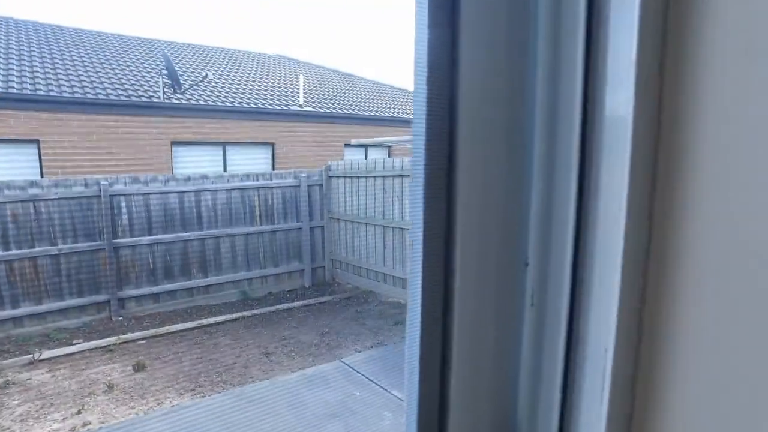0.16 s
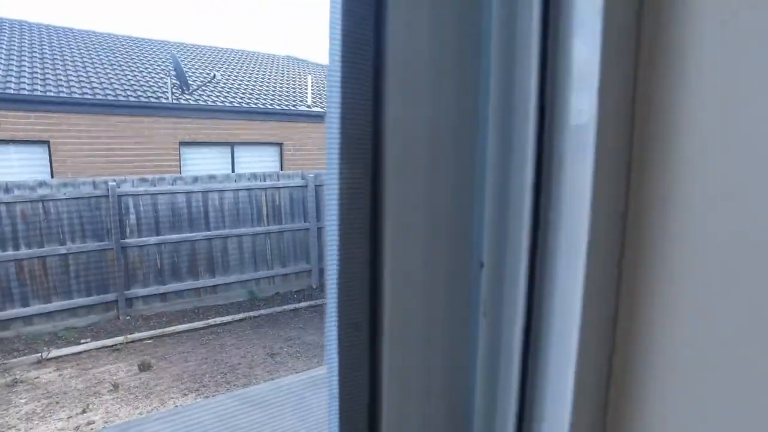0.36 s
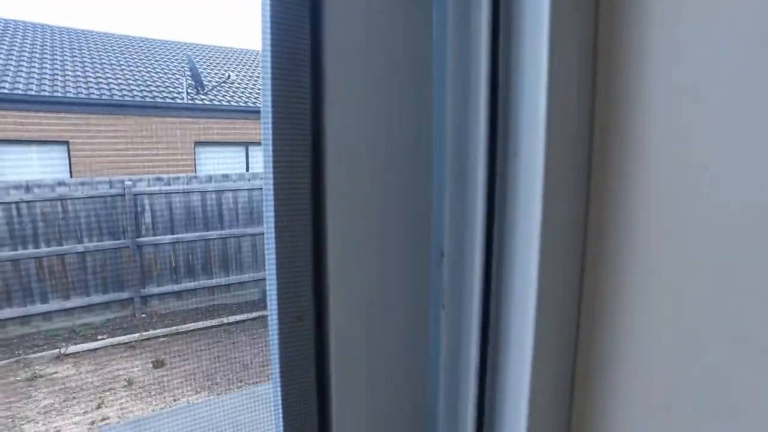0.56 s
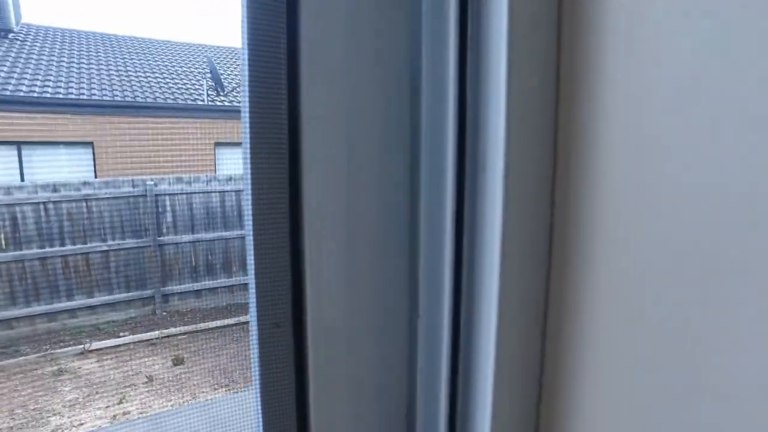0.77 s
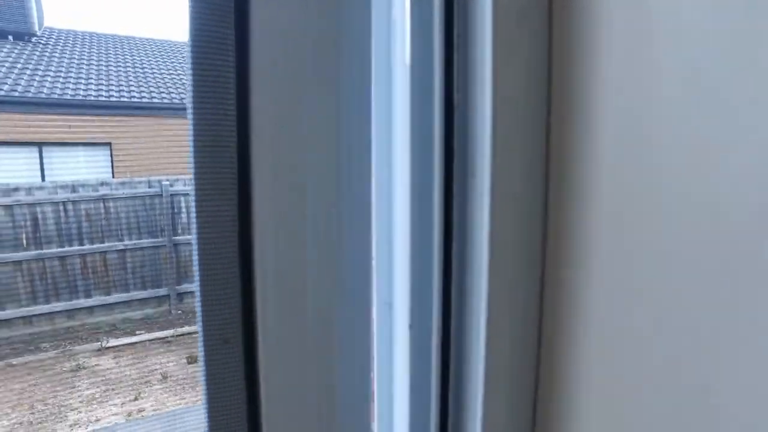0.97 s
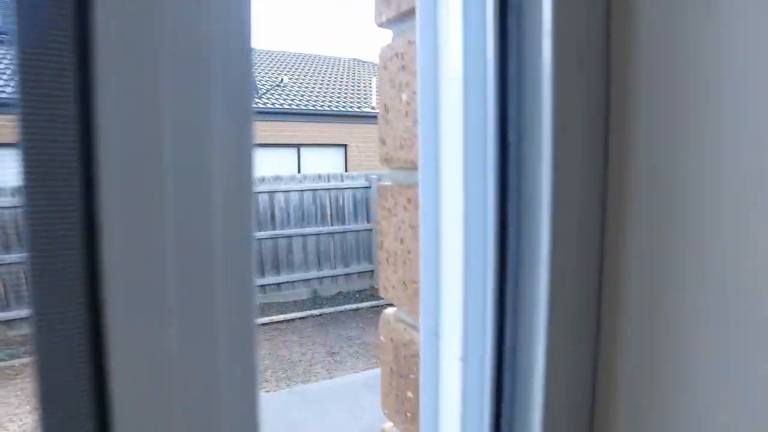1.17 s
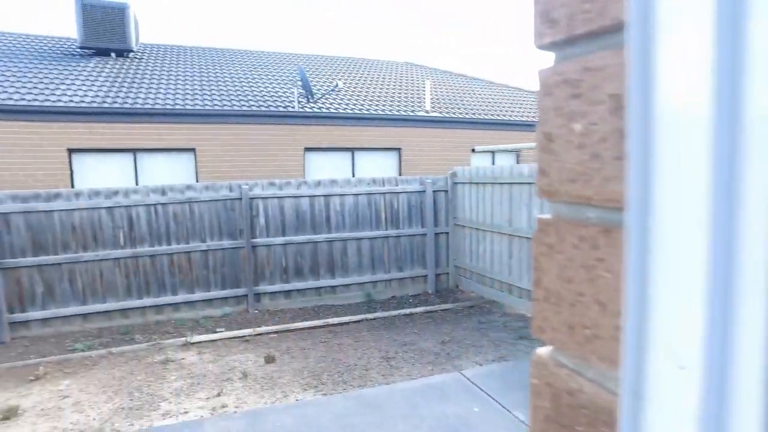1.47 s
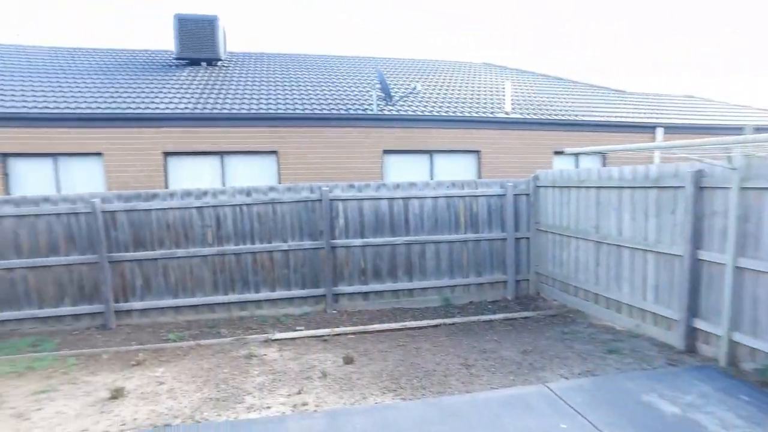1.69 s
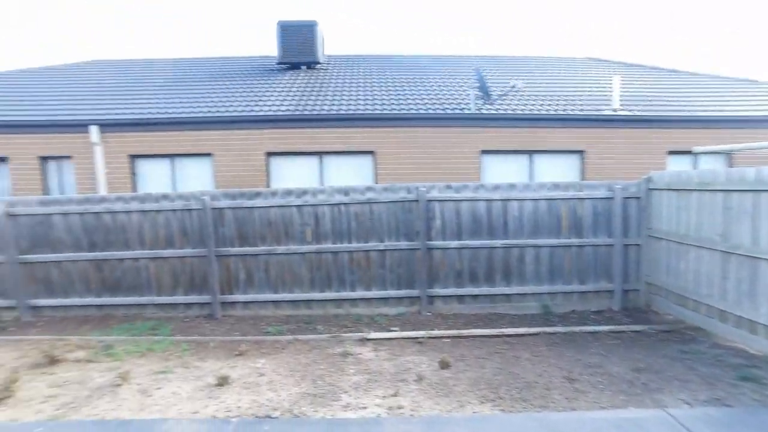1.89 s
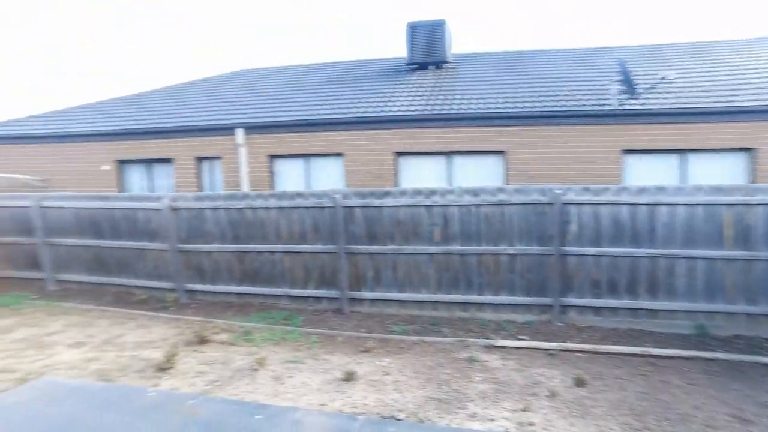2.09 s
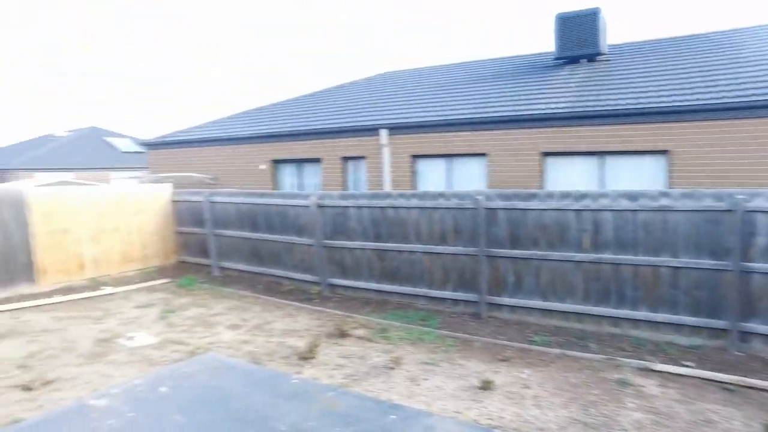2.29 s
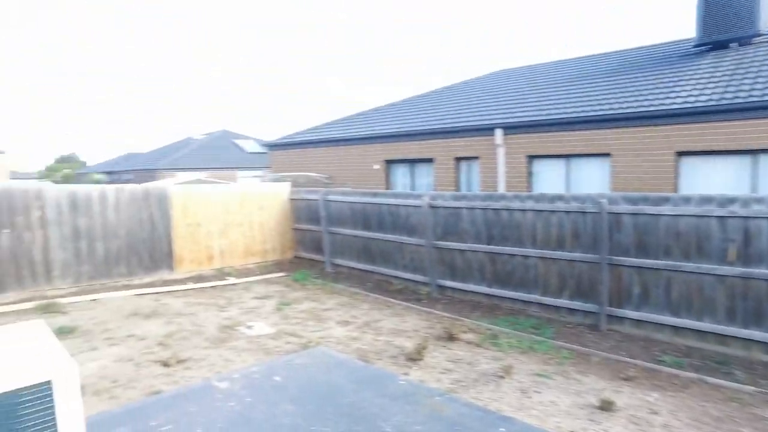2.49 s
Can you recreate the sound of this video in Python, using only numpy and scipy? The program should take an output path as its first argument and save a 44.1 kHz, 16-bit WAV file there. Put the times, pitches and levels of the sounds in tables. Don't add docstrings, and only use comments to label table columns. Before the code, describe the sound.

A heavy sliding door rumbles to a stop, a latch snaps, then wind buffets the microphone

```python
import sys
import numpy as np
from scipy import signal
from scipy.fft import rfft, irfft
from scipy.io import wavfile
from scipy.ndimage import uniform_filter1d

SR = 44100
rng = np.random.default_rng(int(sys.argv[2]) if len(sys.argv) > 2 else 0)


def rack_gain(trim_db):
    fader = np.asarray(trim_db, float)
    return 10 ** (fader / 20)


def persist_wave(psi):
    counts = np.round(np.clip(psi, -1, 1) * 32767).astype(np.int16)
    wavfile.write(sys.argv[1], SR, np.atleast_2d(counts).T)


N = 116865

# time [s], level [dB]
GLASS_ROLL = [(0, -34.5), (.1, -37.5), (.2, -38), (.3, -42), (.36, -46.5), (.4, -48), (.46, -54.5),
              (.52, -58), (.75, -67)]
# frequency [Hz], width [Hz], level [dB]
GLASS_BODY = [(143, 22, -11), (248, 20, 7), (379, 68, 5.5), (510, 51, -7.5), (1170, 120, -1.5),
              (1354, 64, -1)]
# frequency [Hz], level [dB]
GLASS_RUB = [(100, 2.5), (236, 4.5), (546, -6), (900, -13), (1900, -16), (3900, -25), (12000, -38),
             (14600, -74)]
# time [s], level [dB]
WHEEL_ROLL = [(0.0, -49), (0.024, -44), (0.1, -48), (0.114, -40), (0.132, -49), (0.156, -42), (0.186, -50),
              (0.196, -37), (0.62, -73)]
# frequency [Hz], width [Hz], level [dB]
WHEEL_BODY = [(2400, 400, -7), (2660, 330, 0), (3250, 450, -6)]
# start [s], level [dB], brightness [dB per octave]
KNOCKS = [(.001, -26.5, -2.4), (.173, -25, 1.5), (.813, -40.5, -3), (.9115, -19.5, 1), (.917, -35, 2.5),
          (.923, -27, -0.6), (.942, -33.5, -2), (.972, -32.5, 0), (1.35, -43, -2.5), (1.383, -37, -1.5),
          (1.92, -40, 10)]
# frequency [Hz], level [dB], 60 dB decay [s]
FRAME_MODES = [(99.3, -5, .12), (184.3, -8, .15), (293.3, 5, .17), (395, 0, .11), (472, -4.5, .09),
               (726, -4, .05), (1087, -6, .06), (1450, -5, .04), (1850, -9, .03), (2500, -18, .02)]
# time [s], level [dB]
BREEZE = [(0, -41), (.4, -35.5), (.72, -42.5), (.9, -34), (1.3, -42), (1.55, -35.5), (1.8, -39.5),
          (2.0, -35.5), (2.1, -28.5), (2.4, -28.5), (2.65, -31)]
# frequency [Hz], density [dB per Hz]
RUMBLE = [(4, 4), (15, 7.5), (35, 9), (70, -3), (140, -15.5), (300, -55.5)]
# time of the swing [s], push [dB], suction [dB], length [s]
EDDIES = [(0.867, -22.5, -38, 0.0042), (1.161, -31, -27.5, 0.0047), (1.565, -24.5, -24, 0.0072),
          (1.932, -48, -24, 0.0081), (2.042, -24, -8, 0.01), (2.133, -12, -14.5, 0.024),
          (2.266, -9.5, -14, 0.014), (2.345, -13.5, -4.5, 0.016), (2.44, -8.5, -31, 0.032),
          (2.454, -27, -14, 0.0098), (2.505, -31, -15.5, 0.012), (2.586, -31, -15, 0.035),
          (2.67, -12, -18, 0.022)]
# frequency [Hz], level [dB]
YARD_COLOUR = [(90, 0.5), (250, -4), (700, -13.5), (1500, -20.5), (3200, -26.5), (6000, -74)]
# time [s], yard [dB], hiss [dB]
AIR_LEVELS = [(0, 3.5, -62), (.8, -1.5, -60.5), (1.4, 5, -72), (2.3, 2, -60.5), (2.65, 0, -71.5)]
# frequency [Hz], density [dB per Hz]
HISS_COLOUR = [(1000, 4.5), (7500, 6.5), (12500, -1.5), (15000, 5)]
# start [s], level [dB], brightness [dB per octave]
TICKS = [(.079, -42, -1), (.1121, -27, -8), (.1511, -25, -13), (.1965, -20.5, -6), (.201, -26, -11),
         (.2184, -24.5, -3), (.2235, -29, 7), (.231, -33, -4), (.28, -27.5, -1.5), (.33, -32, -3),
         (.5132, -46, -10), (.7851, -40, -3)]
# frequency [Hz], level [dB], 60 dB decay [s]
TRACK_MODES = [(2600, 6, .022), (3450, 2, .018), (4400, -6, .014), (5050, -7, .014), (5750, -9, .012),
               (6900, -12, .01), (8100, -14, .011)]
# time [s], roll [dB], brush strip [dB]
SCREEN_ROLL = [(.8, -63, -90), (.97, -43.5, -65), (1.12, -51.5, -60), (1.3, -42, -53.5), (1.5, -40.5, -54),
               (1.66, -39.5, -62), (1.8, -42.5, -73), (2.0, -43, -59.5), (2.15, -52, -67.5)]
# frequency [Hz], width [Hz], level [dB]
SCREEN_BODY = [(217, 52, 5.5), (283, 28, 8.5), (400, 130, -40), (756, 580, -1.5), (1230, 1100, -30)]
# frequency [Hz], density [dB per Hz]
BRUSH_COLOUR = [(1760, -20), (3000, -7), (4500, -2), (5250, -4), (5900, 1), (7200, -1), (9500, -7.5),
                (15000, -15)]
# time [s], pitch [Hz], level [dB]
SQUEAL = [(.93, 6100, -80), (.98, 6080, -65), (1.05, 6120, -65), (1.08, 6170, -58), (1.105, 6130, -67),
          (1.15, 6050, -63), (1.21, 5930, -66), (1.25, 5870, -61), (1.33, 5900, -70)]
# start [s], level [dB], brightness [dB per octave]
SNAPS = [
    (.8612, -31.5, -9.5),
    (.8640, -29, -7),
    (.8685, -37, 4),
    (.8725, -28.5, 3),
    (.877, -37, -11),
    (.883, -38, -1),
]
# frequency [Hz], level [dB], 60 dB decay [s]
LATCH_MODES = [(700, -3, .022), (877, 2, .035), (1090, 1, .04), (1300, -6, .03), (1590, -4, .03),
               (1950, -12, .02), (2380, -8, .025), (2800, 6, .035), (3400, -13, .012), (4540, -11, .02),
               (5040, -12, .02), (5880, -8, .025)]
# start [s], level [dB], brightness [dB per octave]
PINGS = [
    (.8605, -30, -0.5),
    (.8655, -38.5, 4.5),
    (.8682, -26, 0),
    (.872, -41, 3),
    (.877, -46, -4),
]
# frequency [Hz], level [dB], 60 dB decay [s]
PIN_MODES = [(5830, -8, .012), (7900, -5, .012), (8350, -2, 0.011), (9000, -3, .01), (10300, -8, 0.011),
             (11900, -11, 0.011), (13300, -12, .012)]
# start [s], level [dB], brightness [dB per octave]
CLICKS = [(.912, -48, -5), (.953, -50, 3), (1.005, -50, 1), (1.2325, -32, -2), (1.2615, -40, -1.5),
          (1.2685, -30, -.5), (1.307, -42, -1), (1.443, -46, 1), (1.5466, -40, 2), (1.577, -41, 3),
          (1.84, -43, -5), (1.89, -43, -6), (1.943, -47, 2), (2.17, -48, 0), (2.232, -41, -3),
          (2.265, -44, -6)]
# frequency [Hz], level [dB], 60 dB decay [s]
GUIDE_MODES = [(2800, -4, .012), (4400, 0, .012), (5200, -3, .01), (7050, -1.5, .015), (9500, -8, .008)]
# centre [s], length [s], level [dB]
SCUFFS = [
    (1.166, 0.058, -59),
    (1.577, 0.15, -49.5),
    (1.775, 0.28, -52),
    (1.955, 0.025, -50.5),
    (2.214, 0.042, -55.5),
]
# frequency [Hz], level [dB]
SCUFF_COLOUR = [(1500, -3.5), (5200, -0.5), (6000, 2), (8300, 4.5), (12000, -0.5), (15000, -2.5)]
# time [s], pitch [Hz], level [dB], octave level [dB]
BIRD = [(2.505, 2860, -85, -91), (2.52, 2910, -68, -72), (2.555, 2985, -60, -70), (2.585, 2900, -69, -70),
        (2.592, 3250, -76, -64), (2.602, 3080, -67, -62), (2.613, 3070, -72, -63), (2.619, 2900, -68, -68),
        (2.624, 2800, -90, -90)]
# time [s], pitch [Hz], level [dB]
BIRD_FALL = [(2.61, 2950, -85), (2.618, 2800, -63), (2.635, 2300, -64), (2.65, 2250, -62)]


def evened(x):
    return x / np.sqrt(np.mean(x ** 2) + 1e-20)


def curve(rows, axis=1, off=None):
    rows = np.array(rows, float)
    return np.interp(np.arange(N) / SR, rows[:, 0], rows[:, axis], off, off)


def colour(x, points):
    f, db = np.transpose(points)
    hz = np.fft.rfftfreq(N, 1 / SR) + .1
    low = 12 * np.minimum(np.log2(hz / f[0]), 0)
    gain = rack_gain(np.interp(np.log(hz), np.log(f), db) + low)
    return evened(irfft(rfft(x) * gain, N))


def wander(rate_hz):
    hz = np.fft.rfftfreq(N, 1 / SR)
    slow = (hz > 0) / (1 + (hz / rate_hz) ** 2)
    return evened(irfft(rfft(rng.standard_normal(N)) * slow, N))


def resonate(x, hz, width):
    turn = np.exp(2j * np.pi * np.cumsum(hz * np.ones(len(x))) / SR)
    r = np.exp(-np.pi * width / SR)
    return 2 * (turn * signal.lfilter([1 - r], [1, -r], x / turn)).real


def resonate_twice(x, hz, width):
    return resonate(resonate(x, hz, width), hz, width)


def grit(per_s, spread_db):
    size = rack_gain(spread_db * np.minimum(rng.exponential(1, N), 4))
    sign = rng.choice([-1., 1.], N)
    return evened(size * sign * (rng.random(N) < per_s / SR))


def body(x, peaks, filt=resonate):
    return evened(sum(rack_gain(db) * evened(filt(x, hz, width)) for hz, width, db in peaks))


def strike(hits, modes, crack_db, rise_s, rough):
    out, t = np.zeros(N + SR), np.arange(SR // 4) / SR
    chance = rng.random((len(hits), len(modes), 2))
    for (s, db, tilt_db), draw in zip(hits, chance):
        ring = rack_gain(crack_db - 60 * t / 0.017) * rng.standard_normal(len(t))
        for (hz, mode_db, t60), (a, b) in zip(modes, draw):
            level_db = mode_db + tilt_db * np.log2(hz / 2000) + 6.17 * (a - 2.0)
            drift = uniform_filter1d(np.cumsum(rng.standard_normal(len(t))), size=24)
            phase = 2 * np.pi * hz * (1 + 0.06 * (b - .5)) * t + rough * np.sqrt(hz / 2000) * drift
            ring += rack_gain(level_db - 60 * t / t60) * np.sin(phase)
        at = max(round(s * SR), 0)
        out[at:at + len(t)] += rack_gain(db) * ring * np.minimum(t / rise_s, 1)
    return out[:N]


def doorway(x):
    t60_s, level_db = 0.077, -7
    t = np.arange(SR // 2) / SR
    tail = grit(2000, .1)[:len(t)] * rack_gain(-60 * t / t60_s) * (t > .004)
    return x + rack_gain(level_db) * signal.fftconvolve(x, tail / np.linalg.norm(tail))[:N]


def glass_door():
    drive = grit(4000, 1.5) * rack_gain(.6 * wander(40))
    rub = colour(grit(9000, 1.2) * rack_gain(.6 * wander(30)), GLASS_RUB)
    roll = rack_gain(curve(GLASS_ROLL, off=-120)) * (body(drive, GLASS_BODY) + rack_gain(5) * rub)
    chatter = grit(1500, 2.5) * rack_gain(.8 * wander(36))
    wheel = body(chatter, WHEEL_BODY, resonate_twice)
    return roll + wheel * rack_gain(curve(WHEEL_ROLL, off=-120) - 1.5)


def frame_knocks():
    return strike(KNOCKS, FRAME_MODES, crack_db=-49, rise_s=0.00081, rough=.14)


def wind():
    t = np.arange(N) / SR
    out = rack_gain(curve(BREEZE) + 1.7 * wander(2.6)) * colour(rng.standard_normal(N), RUMBLE)
    for s, push_db, suck_db, length in EDDIES:
        u = (t - s) / length
        swing_db = push_db + (suck_db - push_db) * (1 + np.tanh(2 * u)) / 2
        out = out + rack_gain(swing_db) * -u * np.exp(.5 - .5 * u ** 2)
    return out


def yard():
    level_db = -49 + curve(AIR_LEVELS) + 0.48 * wander(3.5)
    return rack_gain(level_db) * colour(rng.standard_normal(N), YARD_COLOUR)


def hiss():
    level_db = curve(AIR_LEVELS, axis=2) + 0.55 * wander(33)
    return rack_gain(level_db) * colour(rng.standard_normal(N), HISS_COLOUR)


def track_ticks():
    return strike(TICKS, TRACK_MODES, crack_db=-42, rise_s=0.00089, rough=.08)


def screen_door():
    drive = grit(2500, 2.6) * rack_gain(.9 * wander(40))
    roll = rack_gain(curve(SCREEN_ROLL, off=-120)) * body(drive, SCREEN_BODY)
    bristles = colour(grit(9000, 1.8) * rack_gain(.9 * wander(50)), BRUSH_COLOUR)
    brush = rack_gain(curve(SCREEN_ROLL, axis=2, off=-120)) * bristles
    squeal = evened(resonate_twice(rng.standard_normal(N), curve(SQUEAL), width=330))
    return roll + brush + squeal * rack_gain(curve(SQUEAL, axis=2, off=-120))


def latch():
    snaps = strike(SNAPS, LATCH_MODES, crack_db=-20, rise_s=0.0011, rough=.09)
    return snaps + strike(PINGS, PIN_MODES, crack_db=-15, rise_s=0.00045, rough=.06)


def guide_clicks():
    return strike(CLICKS, GUIDE_MODES, crack_db=-10.5, rise_s=0.00011, rough=.08)


def scuffs():
    t = np.arange(N) / SR
    shape = sum(rack_gain(db) * np.exp(-(2.4 * (t - s) / length) ** 2) for s, length, db in SCUFFS)
    return shape * colour(grit(7600, 2.5), SCUFF_COLOUR)


def bird():
    early_s, early_db = .3, -2
    turn = 2 * np.pi * np.cumsum(curve(BIRD) * (1 + 0.00424 * wander(200))) / SR
    low = rack_gain(curve(BIRD, axis=2, off=-140)) * np.sin(turn)
    octave = rack_gain(curve(BIRD, axis=3, off=-140)) * np.sin(2 * turn)
    opening = (0.72 * low + octave) * (np.arange(N) < BIRD[3][0] * SR)
    early = rack_gain(early_db) * np.roll(opening, -round(early_s * SR))
    fall = 2 * np.pi * np.cumsum(curve(BIRD_FALL)) / SR
    falling = rack_gain(curve(BIRD_FALL, axis=2, off=-140)) * np.sin(fall)
    return np.sqrt(2) * rack_gain(2.7 * wander(80)) * (low + octave + early + falling)


def scene():
    hits = doorway(frame_knocks() + track_ticks() + latch())
    near = glass_door() + hits + screen_door() + guide_clicks() + scuffs()
    return (near + wind() + yard() + hiss() + bird())[None]


def roll_off(x):
    return signal.sosfilt(signal.butter(12, 15120, fs=SR, output="sos"), x)


def record(dry):
    top_hz, top_loss = 14000, .8
    hz = np.fft.rfftfreq(N, 1 / SR)
    dulling = 1 - top_loss / (1 + np.exp((top_hz - hz) / 300))
    return roll_off(irfft(rfft(dry) * dulling, N))


dry = scene()
out = record(dry)
persist_wave(out)
```